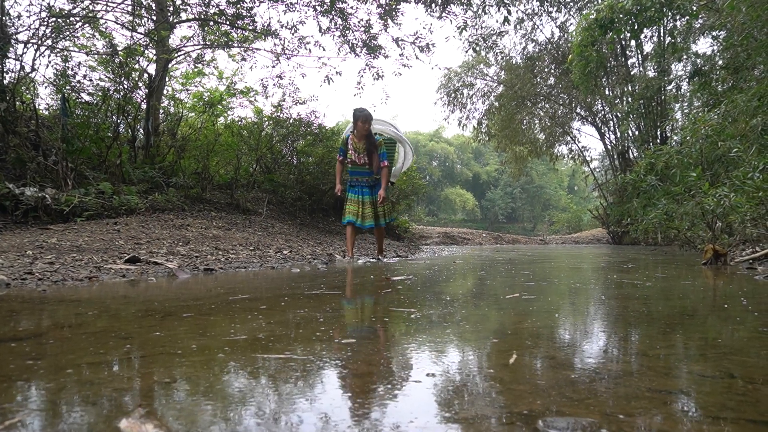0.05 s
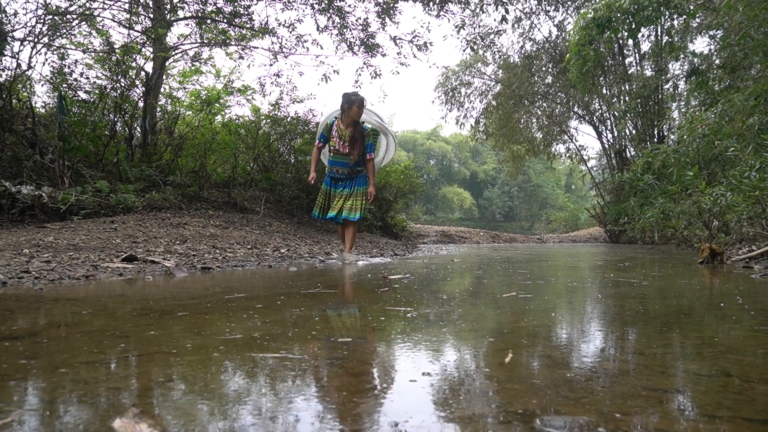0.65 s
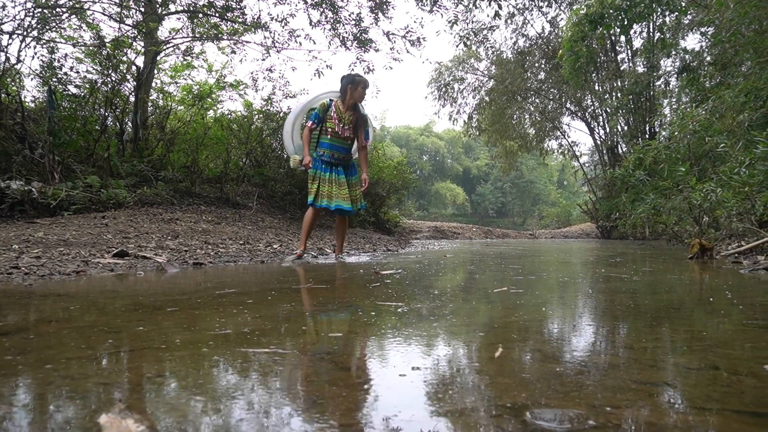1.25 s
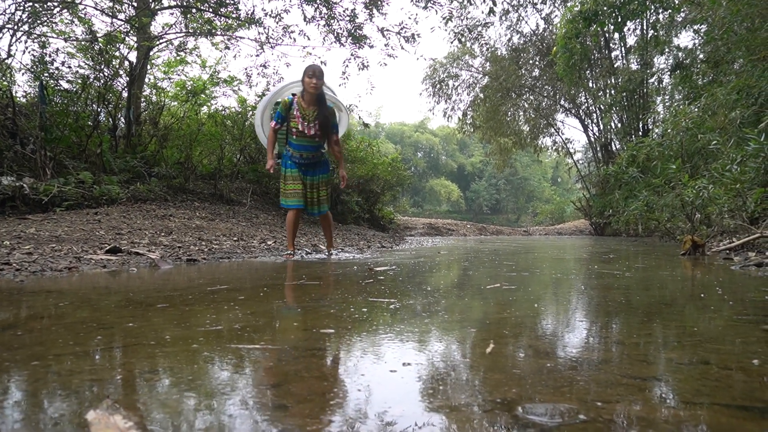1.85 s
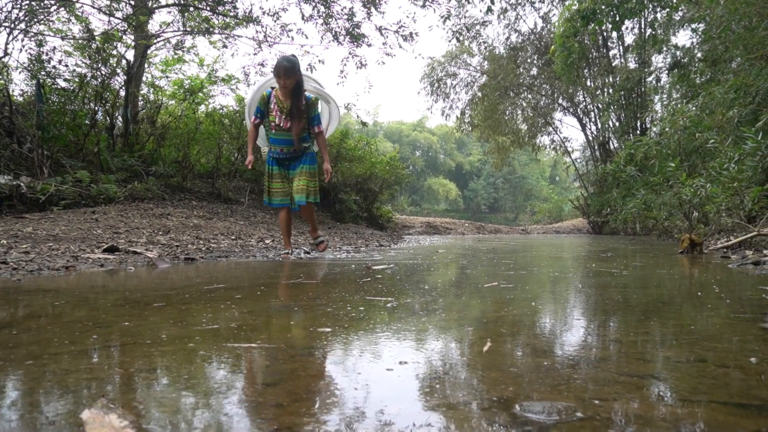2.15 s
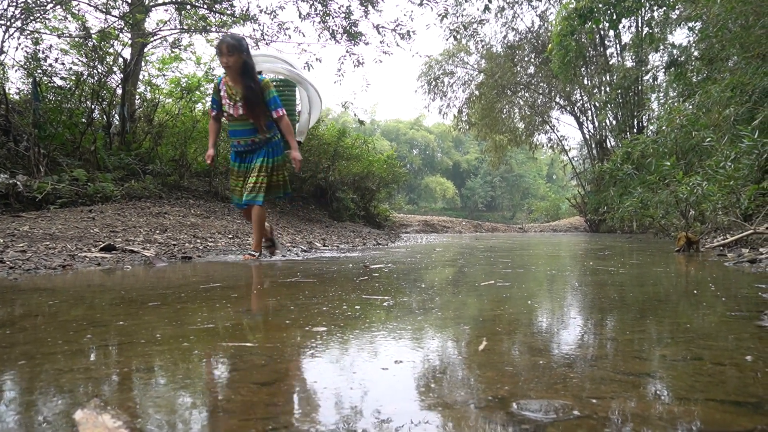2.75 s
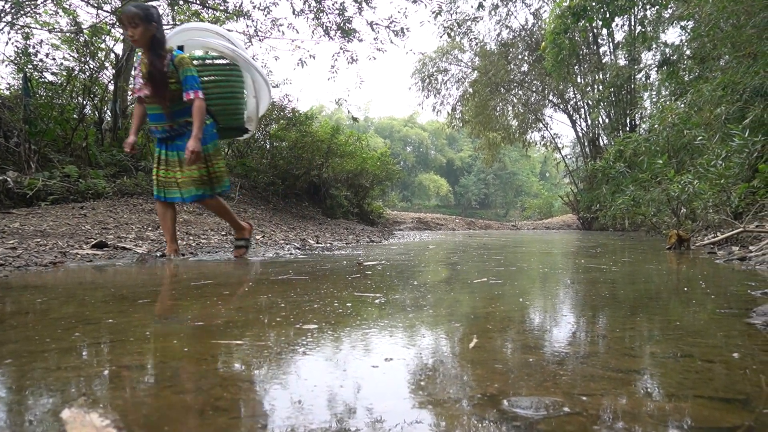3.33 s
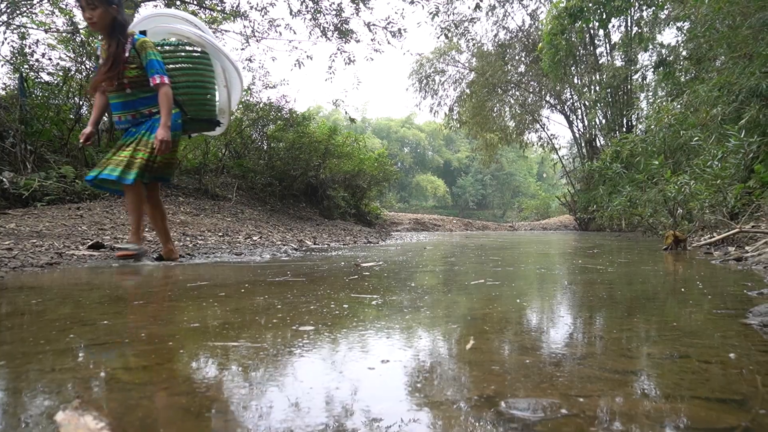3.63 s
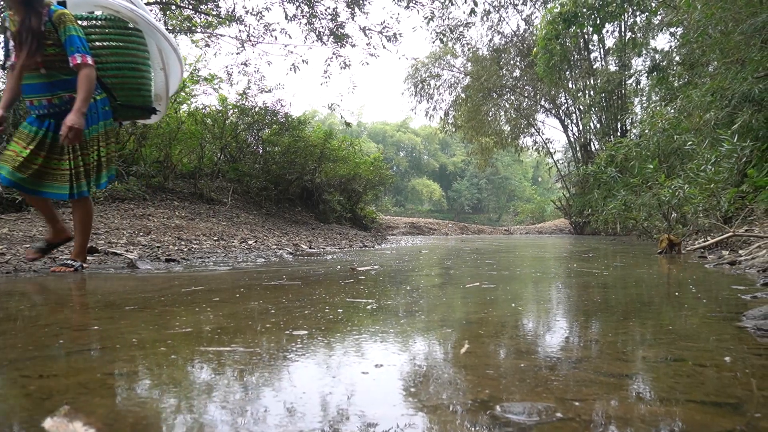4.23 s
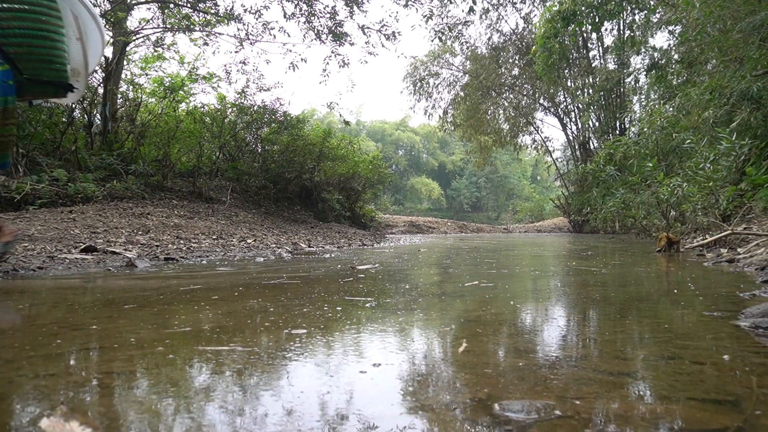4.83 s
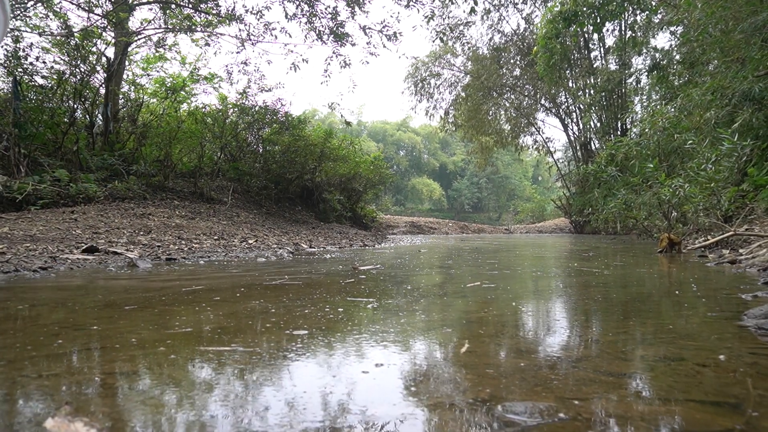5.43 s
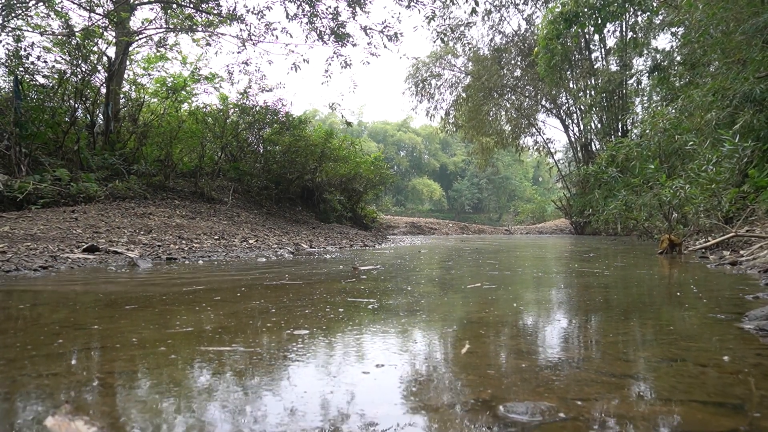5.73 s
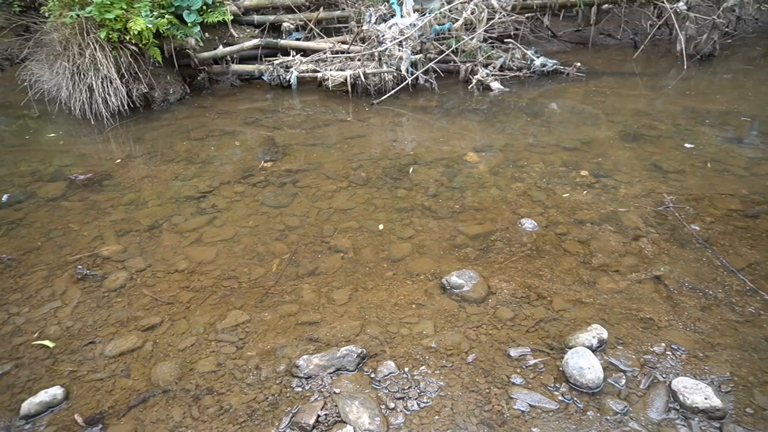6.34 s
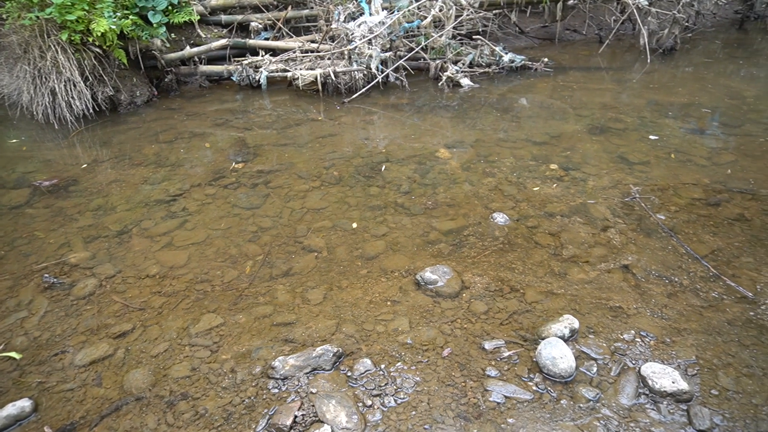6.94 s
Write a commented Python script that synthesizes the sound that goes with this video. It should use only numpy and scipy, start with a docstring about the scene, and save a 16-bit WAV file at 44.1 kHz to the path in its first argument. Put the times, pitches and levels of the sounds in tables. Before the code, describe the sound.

Steady wading footsteps splash and slosh through shallow water outdoors, with gurgles, fine spray and muffled clicks of pebbles. The steps begin near the centre and move left as they approach the microphone, over a very faint low engine hum and distant cicadas. After about six seconds the place changes abruptly: the steps are gone, leaving a soft wash of leaves and slow water and a thin, high cicada trill.

```python
"""Someone in sandals wades across a shallow stream, nearing a stereo microphone and passing to its left.
Each step slaps the surface, throws spray and churns up ringing bubbles; pebbles knock underfoot.
Far behind the ford an engine hums and cicadas sing in the trees, over a wash of leaves and slow water.
Near the end the place changes abruptly to a quiet bank, with cicadas closer to the microphone."""
import sys
import numpy as np
from scipy import signal
from scipy.fft import rfft, irfft, next_fast_len
from scipy.io import wavfile
from scipy.ndimage import uniform_filter1d, map_coordinates

SR = 44100
rng = np.random.default_rng(int(sys.argv[2]) if len(sys.argv) > 2 else 0)


def persist_wave(psi):
    """Save psi, clipped to +-1, as 16-bit WAV."""
    counts = np.round(np.clip(psi, -1, 1) * 32767).astype(np.int16)
    wavfile.write(sys.argv[1], SR, np.atleast_2d(counts).T)


N = 312211
T = np.arange(N) / SR

# A foot kicks through the surface and flings water ahead: start_s, hold_s, splash_db, spray_db
KICKS = [(0.008, 0.066, -39, -46), (0.52, 0.077, -41, -43.5), (1.06, 0.11, -53, -49),
         (1.16, 0.11, -45, -46.5), (2.173, 0.12, -51, -55.5), (2.352, 0.13, -46.5, -44),
         (3.067, 0.043, -46, -39), (3.129, 0.017, -35, -37.5), (3.634, 0.021, -48, -39.5),
         (3.739, 0.041, -41.5, -43), (4.36, 0.055, -45.5, -43), (4.992, 0.037, -41, -45),
         (5.675, 0.03, -41, -38.5), (6.234, 0.03, -51.5, -40.5)]
# A foot sinks and takes the weight: start_s, hold_s, splash_db, spray_db, churn_db
PLUNGES = [(0.09, 0.023, -40, -67, -43), (0.177, 0.042, -40, -40, -41), (0.636, 0.21, -47, -51.5, -48),
           (1.286, 0.029, -35.5, -44.5, -45.5), (2.491, 0.072, -36, -40, -51), (3.128, 0.13, -35, -47, -68),
           (3.796, 0.19, -45, -47, -47.5), (4.448, 0.046, -36.5, -41, -48),
           (5.062, 0.11, -42, -50.5, -40.5), (5.208, 0.056, -36, -41, -51), (5.736, 0.029, -45, -41, -54)]
# Pushed water washes back round the legs: crest_s, half_length_s, splash_db, churn_db
WAKES = [(1.44, 0.044, -50, -57), (2.71, 0.22, -42.5, -56.5), (3.35, 0.072, -40.5, -50.5),
         (3.585, 0.2, -57.5, -49), (3.712, 0.028, -51, -42.5), (4.061, 0.2, -48, -69),
         (4.773, 0.36, -53.5, -53.5), (5.355, 0.07, -41.5, -49.5), (6.067, 0.13, -46, -54)]
# Soles and thrown water strike the surface: start_s, level_db, centre_hz, relative_fizz_db
SLAPS = [(0.197, -31.5, 1580, -25), (0.223, -42.5, 2370, 8), (.303, -33.5, 3340, 1.5),
         (0.429, -42.5, 3800, -31), (0.572, -25, 2200, -18), (0.827, -40, 2580, -9),
         (1.232, -29, 2600, -6.5), (1.242, -33.5, 2620, -9), (1.307, -37, 2600, -22),
         (1.319, -35.5, 2370, -20), (1.335, -37, 2960, -6), (1.480, -38, 3100, -4), (2.207, -39, 2620, -25),
         (2.373, -33, 3500, -0.5), (2.578, -32, 2880, -23), (2.774, -34.5, 4100, -2),
         (2.802, -42, 2600, -20), (2.828, -39, 4300, -21), (3.072, -24, 2900, -1),
         (3.0752, -14.5, 3800, -8), (3.644, -32.5, 3500, -7), (3.653, -30.5, 2400, -1.5),
         (3.695, -46, 7000, 5), (3.758, -34, 2140, -10), (3.866, -33.5, 3480, -4.5),
         (3.933, -33.5, 2180, 0), (4.351, -35, 6600, -6), (4.451, -34, 2680, 0), (5.254, -30, 2470, -24),
         (5.28, -29, 6200, -13), (5.656, -28, 1770, 1), (5.72, -32, 2000, 0), (5.7344, -27.5, 920, -11),
         (5.738, -29.5, 2080, 0), (5.798, -30, 2020, -17), (6.108, -38, 3280, -18)]
# Air pockets close round a foot: start_s, level_db, pitch_hz, length_s, rise_octaves
PLOPS = [(0.052, -31, 1480, 0.014, 0.14), (.124, -38, 633, 0.035, 0.07), (0.186, -31.5, 1030, 0.048, 0.045),
         (.209, -28.5, 654, 0.037, 0.094), (0.223, -30.5, 2270, 0.021, 0.032),
         (0.693, -34, 613, 0.025, 0.0068), (0.716, -34, 797, 0.028, 0.034), (0.757, -36, 244, 0.029, 0.28),
         (.788, -37.5, 700, 0.035, 0.078), (0.861, -40.5, 990, 0.02, 0.33), (0.871, -35, 3070, 0.017, 0.1),
         (0.9844, -31, 500, 0.034, 0.008), (1.448, -33.5, 2060, 0.012, 0), (1.47, -37, 709, 0.04, 0.29),
         (2.111, -37, 2930, 0.0094, 0.15), (2.345, -33, 2960, 0.013, .1), (2.554, -28.5, 898, 0.027, 0.14),
         (2.735, -32.5, 3780, 0.014, 0.14), (3.302, -35, 1610, 0.013, 0),
         (3.919, -28.5, 1015, 0.0047, 0.44), (3.967, -35.5, 983, 0.037, 0.86),
         (4.004, -30.5, 897, 0.02, 0.11), (4.065, -38.5, 972, 0.041, 0.72), (4.472, -38, 726, 0.018, 0.16),
         (4.485, -40, 1297, 0.016, 0.88), (5.108, -29, 824, 0.014, 0.093), (5.1295, -26, 883, 0.02, 0.15),
         (5.147, -24.5, 1725, 0.017, 0.25), (5.2025, -24.5, 850, 0.021, 0), (5.235, -35, 482, 0.042, 0.46),
         (5.257, -24.5, 613, 0.0208, .95), (5.311, -27.5, 880, 0.014, 0.37),
         (5.315, -39, 1223, 0.036, 0.38), (5.373, -36, 803, 0.016, 0.2), (5.38, -31.5, 1740, 0.013, 0.35),
         (5.974, -32, 864, 0.0113, 0.36), (6.002, -35, 1720, 0.014, 0.082), (6.061, -36.5, 1920, 0.011, 0),
         (6.084, -27.5, 1566, 0.016, 0.49), (6.118, -39, 765, 0.028, 0.55)]
# The hollow behind a leg fills up: start_s, length_s, level_db, first_pitch_hz, last_pitch_hz
GUSHES = [(1.02, 0.081, -50, 510, 960), (1.393, 0.041, -45.5, 1790, 2300), (3.127, 0.174, -43.5, 950, 3120),
          (5.315, 0.17, -50, 1380, 1960)]
# Pebbles shift underfoot: start_s, level_db, upper_mode_gain_db
PEBBLE_KNOCKS = [(0.132, -28, 6), (.146, -25.5, 12), (0.693, -28.5, 11), (1.532, -29.5, -5),
                 (3.521, -38, -15), (3.547, -31.5, -24), (3.605, -31, -21), (3.695, -26.5, -15),
                 (4.51, -27, 20), (4.53, -32, -2), (4.838, -25.5, 18), (4.853, -26.5, 15),
                 (5.016, -18.5, 3), (5.057, -22, 0), (5.7028, -27, -12), (5.776, -30.5, 10),
                 (5.849, -31, -10), (6.021, -26.5, 8)]
# Resonances of a pebble knock: pitch_hz, width_hz, level_db
PEBBLE_MODES = [(797, 330, 5.2), (1810, 350, 4.1), (2260, 170, 2.9)]
# Heavy footfalls on the stream bed: crest_s, level_db, half_length_s
TREADS = [(3.266, -62.5, 0.82), (4.447, -52, 0.042), (5.736, -51.5, 0.072)]
# Tone of all stirred water, then of churn and of spray alone: frequency_hz, gain_db
WATER_TONE = [(950, -0.5), (1800, -3.5), (2400, 2), (3300, 0.26), (5250, 3), (7000, 1.5)]
CHURN_TONE = [(100, 13), (350, -9.5), (750, 3.0), (1100, -6.5), (1600, 11.5), (4000, -32)]
SPRAY_TONE = [(1000, -19.0), (3000, 0.5), (5200, -2.0), (8000, -0.5), (11000, -3.5), (18000, -12.0)]
# The walker as heard from the microphone: time_s, left_lead_samples, left_over_right_db, top_octave_db
WALKER_PATH = [(0, 0.22, -1, -5.5), (1.5, 0.39, -0.5, -5), (2.6, 0.75, 1.5, -0.5), (3.2, 1.2, 2.5, 4),
               (3.9, 2.45, 3, -6), (4.4, 3.6, 3.5, 4.5), (6.2, 3.6, 3.5, 3.5)]
# The treble that grows as the feet come near: frequency_hz, gain_db
TOP_OCTAVE = [(7000, -40), (10000, -10), (13000, 0)]
# Sound that reaches the microphone off the ripples: frequency_hz, share_db
RIPPLE_SCATTER = [(100, -28), (800, -5.5), (2000, -17), (4000, -0.5), (7500, -3), (11000, -3), (16000, -8)]
# Echo of the banks and trees: frequency_hz, t60_s
BANK_DECAY = [(100, 0.07), (1000, 0.37), (4000, 0.22), (16000, 0.011)]
# A far engine slowly picks up speed: time_s, firing_hz, level_db
ENGINE_RUN = [(0.03, 64.6, -62.5), (0.53, 65.2, -53.5), (0.97, 65.75, -59.5), (1.76, 67.7, -51.5),
              (2.52, 66.2, -52.5), (3.48, 69.9, -50), (3.98, 67.5, -59.5), (5.04, 71.7, -50),
              (5.43, 72.9, -64.5), (5.57, 73.8, -54.5), (6.22, 73.4, -57.5)]
# Tone of the open air at the ford and on the bank: frequency_hz, gain_db
FORD_AIR = [(30, -17), (50, 0.5), (100, -0.5), (160, -6.5), (260, -6), (400, -10.5), (2000, -11.5),
            (4500, -16), (8000, -17.5), (16000, -23.5)]
BANK_AIR = [(20, -16), (60, 2.5), (130, -8), (330, -9.5), (480, -5.5), (800, -10), (4500, -16.5),
            (7500, -22), (16000, -26)]
# How alike the open air is in the two channels: frequency_hz, shared_power_fraction
AIR_COHERENCE = [(60, 1), (130, 0.78), (290, 0.35), (640, 0.011), (1400, 0.0059), (15000, 0.4)]


def wading(kick_churn_db=-10.5, restless_db=(-51, -55, -52.5)):
    """Legs stir up splash (small bubbles), spray (fine drops) and churn (big bubbles): three dB curves."""
    t = T[::64]
    moves = []
    for start_s, hold_s, splash_db, spray_db in KICKS:
        kick = surge(t - start_s, hold_s, rise_s=0.0047, fall_db_per_s=214)
        churn_db = splash_db + kick_churn_db  # a kick takes little air under
        moves.append(np.outer(amp([splash_db, spray_db, churn_db]), kick))
    for start_s, hold_s, *levels_db in PLUNGES:
        plunge = surge(t - start_s, hold_s, rise_s=0.044, fall_db_per_s=201)
        settling = surge(t - start_s, hold_s, rise_s=0.044, fall_db_per_s=28)
        moves.append(np.outer(amp(levels_db), plunge))
        moves.append(np.outer(amp(restless_db), settling))
    for crest_s, half_length_s, splash_db, churn_db in WAKES:
        wake = np.exp(-((t - crest_s) / half_length_s) ** 2)
        spray_db = splash_db - 6.5
        moves.append(np.outer(amp([splash_db, spray_db, churn_db]), wake))
    return [np.interp(T, t, 10 * np.log10(power + 1e-12)) for power in np.square(moves).sum(0)]


def surge(age_s, hold_s, rise_s, fall_db_per_s):
    """One movement in the water builds, holds and dies away."""
    return np.clip(age_s / rise_s, 0, 1) * amp(-fall_db_per_s * np.maximum(age_s - hold_s, 0))


def splash(splash_db, spray_db):
    """Broken water falls back as bubbles: smaller where spray flies, merging into a swish when strong."""
    merged = np.clip(amp((splash_db + 30) / 1.3), 0, .55)
    coarse = swarm(1500, 3200, cycles=38, rise_octaves=.12, spread_db=4.3, count=2600, samples=1300)
    fine = swarm(2600, 6200, cycles=48, rise_octaves=.08, spread_db=4.6, count=3200, samples=800)
    swish = unit(band(rng.standard_normal(N), 700, 5200) * amp(2.5 * drift(400)))
    gain = amp(splash_db - 3)
    patter = gain * coarse + amp((splash_db + spray_db) / 2 - 5) * fine
    return np.sqrt(1 - merged) * patter + np.sqrt(merged) * gain * swish


def spray(spray_db, drops_per_s=1800):
    """Countless fine drops tick on the surface in clumps, blurring into a fizz."""
    landings = rng.random(N) < drops_per_s / SR
    ticks = landings * rng.standard_normal(N) * amp(4.5 * rng.standard_normal(N))
    fizz = (unit(ticks) + .55 * rng.standard_normal(N)) * amp(3 * drift(220))
    return amp(spray_db - 1) * unit(colour(fizz, SPRAY_TONE))


def churn(churn_db, swash_db=-11):
    """Legs push big gulps of air under, over a dull swash."""
    gulps = swarm(350, 1500, cycles=10, rise_octaves=.3, spread_db=3.4, count=4500, samples=1200)
    swash = band(rng.standard_normal(N), 63, 1530)
    return amp(churn_db - 3) * (unit(colour(gulps, CHURN_TONE)) + amp(swash_db) * unit(swash))


def gurgle(churn_db, splash_db):
    """In the wake of a leg, a few long-lived bubbles chirp as they surface, most of them upward."""
    chirps = swarm(700, 2700, cycles=36, rise_octaves=.75, spread_db=4, count=420, samples=2400)
    return amp(np.minimum(churn_db, splash_db) - 5) * chirps


def slaps(band_ratio=1.65, rise_s=0.00052, spatter_s=.03, spatter_db=-23, cavity_db=-6):
    """A sharp crack and a tight cluster of impacts thump the air cavity below, with fizz and spatter."""
    out, t = np.zeros(N), np.arange(4000) / SR
    for start_s, level_db, centre_hz, fizz_db in SLAPS:
        length_s = 0.0065 * amp(0.27 * (-28.5 - level_db))  # a harder slap is over sooner
        impacts, drops = rng.standard_normal((2, len(t))) * np.exp(.5 * rng.standard_normal((2, len(t))))
        spatter = amp(spatter_db) * np.exp(-t / spatter_s)
        blow = (1 - np.exp(-t / rise_s)) * (np.exp(-(t / length_s) ** 2) + spatter)
        smack = band(impacts * blow, centre_hz / band_ratio, centre_hz * band_ratio)
        cavity = ring(smack, centre_hz * rng.uniform(.85, 1.1), centre_hz / 8)
        body = unit(smack) + amp(cavity_db) * unit(cavity)
        fizz = band(drops * blow, 4000, 15400, order=1)
        crack = band(1. * (t == 0), 4500, 16000, order=1)
        gain = amp(level_db - 2) * np.sqrt(length_s / t[-1])
        add(out, start_s, gain * (unit(body) + amp(fizz_db) * unit(fizz)))
        add(out, start_s, amp(level_db + fizz_db + 11) * crack)
    return out


def plops(slosh_db=-17, wobble=0.026, twin_db=-13):
    """Single large bubbles wobble in the slosh and shed a smaller twin, climbing faster near the surface."""
    out = np.zeros(N)
    for start_s, level_db, pitch_hz, length_s, rise_octaves in PLOPS:
        age = np.arange(0, 1, 1 / (length_s * SR))
        glide_hz = pitch_hz * 2 ** (rise_octaves * age ** 1.184)
        phase = 2 * np.pi * np.cumsum(glide_hz * (1 + wobble * drift(pitch_hz / 2)[:len(age)])) / SR
        swell = np.sin(np.pi * age ** (0.25 + 0.7 * rise_octaves)) ** 2  # gliders swell late
        twin_ratio = 1.5 * np.exp(rng.standard_normal() / 10)
        tone = np.sin(phase) + amp(twin_db) * np.sin(phase * twin_ratio)
        slosh = unit(band(rng.standard_normal(SR // 10), pitch_hz / np.sqrt(2), pitch_hz * np.sqrt(8)))
        add(out, start_s, amp(level_db - .5) * swell * (tone + amp(slosh_db) * slosh[:len(age)]))
    return out * (1 + .22 * drift(450))


def gushes(scatter_octaves=0.534, cycles=34, bubbles_per_s=210):
    """A closing hollow breaks into a crowd of bubbles that grow smaller and higher as it shrinks."""
    out, t = np.zeros(N), np.arange(SR // 20) / SR
    for start_s, length_s, level_db, first_hz, last_hz in GUSHES:
        burble = np.zeros(round(length_s * SR) + len(t))
        count = round(bubbles_per_s * length_s)
        for k, (late, pitch, strength) in enumerate(rng.random((count, 3))):
            filled = (k + late) / count
            hz = first_hz * (last_hz / first_hz) ** filled * 2 ** (scatter_octaves * (2 * pitch - 1))
            gain = np.sqrt(np.sin(np.pi * filled)) * (.5 + strength)
            note = bubble(t, hz, cycles / hz, rise_octaves=0.12, onset_cycles=0.74)
            add(burble, filled * length_s, gain * note)
        rms = np.sqrt(np.sum(burble ** 2) / (length_s * SR))
        add(out, start_s, amp(level_db) * burble / rms)
    return out


def bubble(t, hz, t60_s, rise_octaves, onset_cycles):
    """A bubble swells, rings and dies; its pitch glides as it nears the surface."""
    age = np.minimum(t / t60_s, 2)
    turns = np.cumsum(hz * 2 ** (rise_octaves * age), axis=-1) / SR
    onset = 1 - np.exp(-(turns / onset_cycles) ** 2)
    return np.sin(2 * np.pi * turns) * onset * amp(-60 * age)


def swarm(low_hz, high_hz, cycles, rise_octaves, spread_db, count, samples):
    """A steady swarm of bubbles of random pitch, life and strength, rms about 1."""
    when, pitch, life, glide, strength = rng.random((count, 5)).T[:, :, None]
    hz = low_hz * (high_hz / low_hz) ** pitch
    t60_s = cycles * 2 ** (2 * life - 1) / hz
    rings = bubble(np.arange(samples) / SR, hz, t60_s, rise_octaves * (2 * glide - .5), onset_cycles=1)
    rings *= amp(-spread_db * np.log(strength + .025))  # many faint, few loud
    positions = (when * N).astype(int) + np.arange(samples)
    crowd = unit(np.bincount(positions.ravel(), rings.ravel(), N)[:N])
    return crowd / np.sqrt(uniform_filter1d(crowd ** 2, size=3000) + .02)


def pebbles(grind_s=0.0027, grind_db=-13, muffle_hz=3100):
    """Pebbles shift underfoot: one contact and a brief grind, damped and muffled by the water above."""
    out, t = np.zeros(N), np.arange(1500) / SR
    for start_s, level_db, upper_db in PEBBLE_KNOCKS:
        contact = (t == 0) + amp(grind_db) * rng.standard_normal(len(t)) * np.exp(-t / grind_s)
        modes = sum(amp(mode_db + upper_db * (k > 0)) * unit(ring(contact, hz, width_hz))
                    for k, (hz, width_hz, mode_db) in enumerate(PEBBLE_MODES))
        knock = band(modes, 140, muffle_hz, order=3)
        add(out, start_s, amp(level_db) * knock / abs(knock).max())
    return out


def treads():
    """Weight comes down on the gravel bed with a dull bump."""
    weight = sum(amp(level_db) * np.exp(-((T - crest_s) / half_length_s) ** 2)
                 for crest_s, level_db, half_length_s in TREADS)
    return weight * unit(band(rng.standard_normal(N), 105, 246))


def to_microphone(steps, echo_db=-19, ripples_per_s=220):
    """The steps arrive direct from the walker's bearing, off the rippled water and back from the banks."""
    steps = steps + (amp(along(WALKER_PATH, 3)) - 1) * colour(steps, TOP_OCTAVE)
    lead_samples = along(WALKER_PATH, 1)
    balance = amp(np.array([[1], [-1]]) * along(WALKER_PATH, 2) / 2)
    direct_share = [(hz, 10 * np.log10(max(1 - amp(db) ** 2, .05))) for hz, db in RIPPLE_SCATTER]
    direct = colour(steps, direct_share)
    pair = np.array([map_coordinates(direct, [np.arange(N) + side * lead_samples / 2], order=3)
                     for side in (1, -1)])
    # the moving surface turns the scattered sound's phase at random, differently in each channel
    scattered = signal.hilbert(np.roll(colour(steps, RIPPLE_SCATTER), 13), next_fast_len(N))[:N]
    rippled = np.array([(scattered * np.exp(2j * drift(ripples_per_s))).real for _ in range(2)])
    return (pair + rippled) * balance + amp(echo_db) * bank_echo(steps)


def bank_echo(steps, build_s=0.014):
    """Banks and trees return a short diffuse tail that lasts longest in the midrange."""
    hz, t, noise = signal.stft(rng.standard_normal((2, SR // 2)), SR, nperseg=256)
    decay = amp(-60 * t / across(BANK_DECAY, hz)[:, None])
    tail = signal.istft(noise * decay * np.minimum(t / build_s, 1), SR, nperseg=256)[1]
    return signal.oaconvolve(steps[None], tail / np.linalg.norm(tail[0]), axes=1)[:, :N]


def near_cicada(level_db=-57, high_hz=6625, low_hz=6430, pulse_hz=78, throb_hz=17):
    """Tymbal pulses ring the abdomen in an uneven trill; with each throb of the body a lower note joins."""
    pulses = np.cumsum(pulse_hz * (1 + .18 * drift(60))) / SR
    trill = np.sin(np.pi * pulses) ** 4 + .35
    throb = .5 + .5 * np.sin(2 * np.pi * (throb_hz * T + .3 * drift(12)))
    high = np.sin(2 * np.pi * np.cumsum(high_hz + 25 * drift(150)) / SR) * (.5 + .5 * throb)
    low = np.sin(2 * np.pi * np.cumsum(low_hz + 70 * drift(110)) / SR) * throb ** 2
    return amp(level_db + 2 * drift(40)) * unit((high + .7 * low) * trill)


def far_cicadas(centre_hz, width_hz, level_db, waver_db=3.5):
    """At a distance, many cicadas blur into one narrow, wavering band."""
    gain = amp(level_db + waver_db * drift(14))
    low_hz, high_hz = centre_hz - width_hz / 2, centre_hz + width_hz / 2
    return gain * unit(band(rng.standard_normal((2, N)), low_hz, high_hz, order=1))


def cicada_phrases(depth_db=2.0, period_s=.336, crest_s=1.888):
    """The far cicadas swell and ease together in even phrases."""
    return amp(depth_db * np.cos(2 * np.pi * (T - crest_s) / period_s))


def far_engine(octave_db=-23):
    """Only an engine's lowest note and a faint octave carry this far, wavering in the air."""
    turns = np.cumsum(along(ENGINE_RUN, 1) + 0.28 * drift(28.4)) / SR
    note = np.sin(2 * np.pi * turns) + amp(octave_db) * np.sin(4 * np.pi * turns)
    return unit(note) * amp(along(ENGINE_RUN, 2) + 0.14 * drift(5.8))


def open_air(spectrum, level_db):
    """Leaves and slow water all round: a soft wash, most alike across the microphone pair in the bass."""
    noise = rng.standard_normal((3, N))
    shares = [(hz, np.clip(share, .01, .99)) for hz, share in AIR_COHERENCE]
    common = colour(noise[0], [(hz, 10 * np.log10(share)) for hz, share in shares])
    separate = colour(noise[1:], [(hz, 10 * np.log10(1 - share)) for hz, share in shares])
    return amp(level_db + .5 * drift(1.74)) * unit(colour(common + separate, spectrum))


def amp(db):
    """Decibels to gain."""
    return 10 ** (np.asarray(db) / 20)


def unit(x):
    """Scales to rms 1."""
    return x / np.sqrt(np.mean(x ** 2) + 1e-20)


def along(table, column):
    """One column of a time curve, at every sample."""
    rows = np.array(table)
    return np.interp(T, rows[:, 0], rows[:, column])


def across(points, hz):
    """A spectrum read on a log-frequency axis."""
    points_hz, values = np.transpose(points)
    return np.interp(np.log(hz + 1), np.log(points_hz + 1), values)


def colour(x, points):
    """Filters by a spectrum in dB."""
    size = next_fast_len(N + 2048)
    gain = amp(across(points, np.fft.rfftfreq(size, 1 / SR)))
    return irfft(rfft(x, size) * gain, size)[..., :N]


def band(x, low_hz, high_hz, order=2):
    """Causal band-pass."""
    return signal.sosfilt(signal.butter(order, [low_hz, high_hz], "band", fs=SR, output="sos"), x)


def ring(x, hz, width_hz):
    """One resonance."""
    return signal.lfilter([1], [1, -np.exp((2j * hz - width_hz) * np.pi / SR)], x).real


def drift(per_s):
    """A random wander through per_s new values a second, rms about 1."""
    return np.interp(T * per_s, np.arange(4096), rng.standard_normal(4096))


def add(mix, start_s, sound):
    """Mixes a sound in at start_s."""
    part = mix[round(start_s * SR):][:len(sound)]
    part += sound[:len(part)]


def scene(ford_end_s=6.283, bank_start_s=6.301):
    """Two microphone positions: the ford, then, after a brief dip in level, the quiet bank."""
    splash_db, spray_db, churn_db = wading()
    stirred = churn(churn_db) + gurgle(churn_db, splash_db) + splash(splash_db, spray_db) + spray(spray_db)
    steps = colour(stirred, WATER_TONE) + plops() + gushes() + pebbles() + slaps() + treads()
    ford = to_microphone(steps) + far_engine() + open_air(FORD_AIR, level_db=-54)
    ford += far_cicadas(6480, width_hz=190, level_db=-62.5, waver_db=5) * cicada_phrases()
    ford += far_cicadas(5340, width_hz=400, level_db=-67.5)
    bank = open_air(BANK_AIR, level_db=-56.5)
    bank += near_cicada() * amp([[.7], [-.7]])  # just left of centre
    bank += far_cicadas(6530, width_hz=220, level_db=-62)
    bank += far_cicadas(5570, width_hz=150, level_db=-61.5)
    ford_fade = np.clip((ford_end_s - T) / .004, 0, 1)
    bank_fade = np.clip((T - bank_start_s) / .002, .05, 1)
    return ford * ford_fade + bank * bank_fade


def record(dry):
    """The recorder passes both channels up to its band limit."""
    edge_hz = 16250
    lowpass = signal.firwin(401, edge_hz, window=("kaiser", 9), fs=SR)
    return signal.oaconvolve(dry, lowpass[None], "same")


dry = scene()
out = record(dry)
persist_wave(out)
```